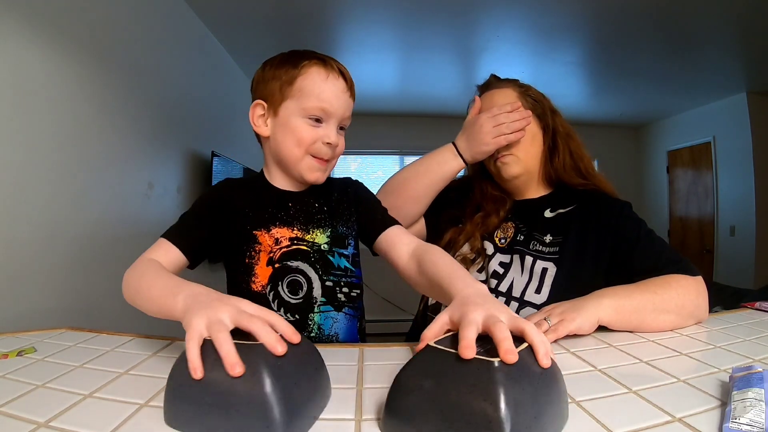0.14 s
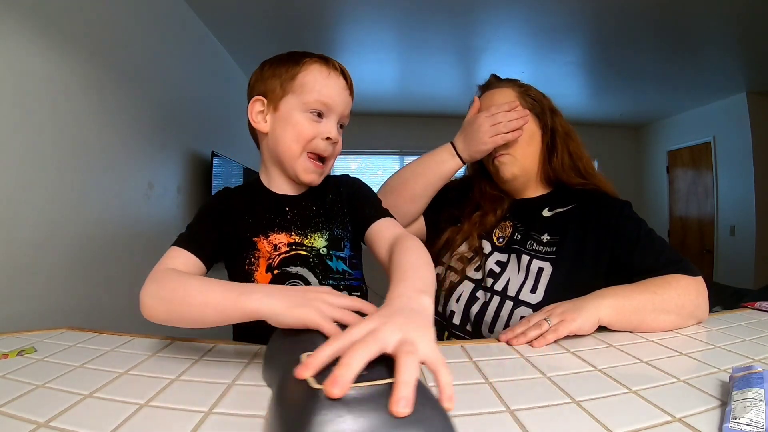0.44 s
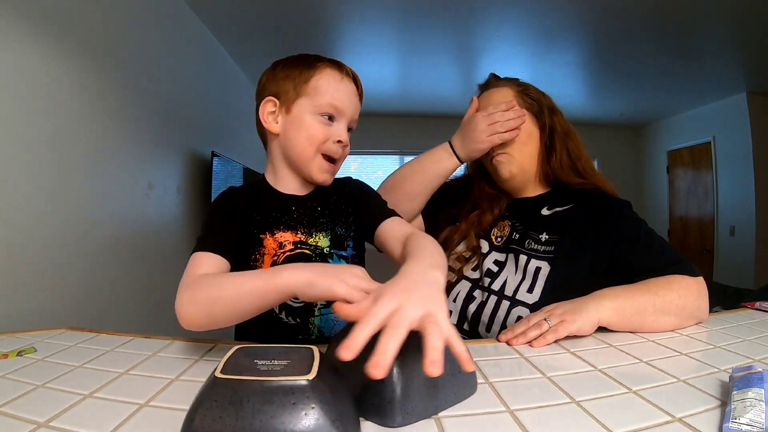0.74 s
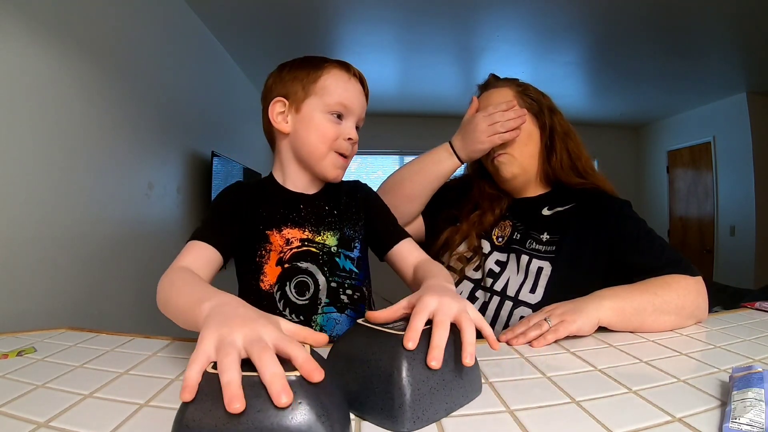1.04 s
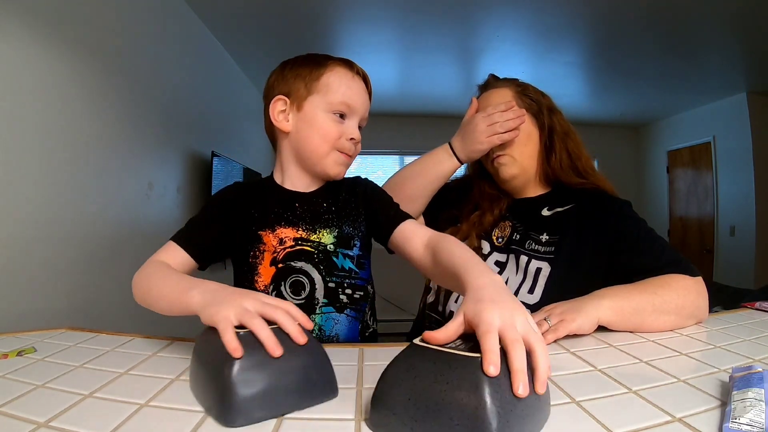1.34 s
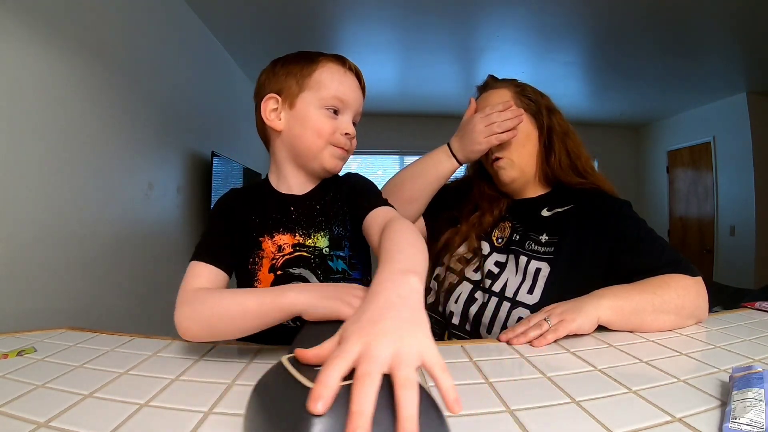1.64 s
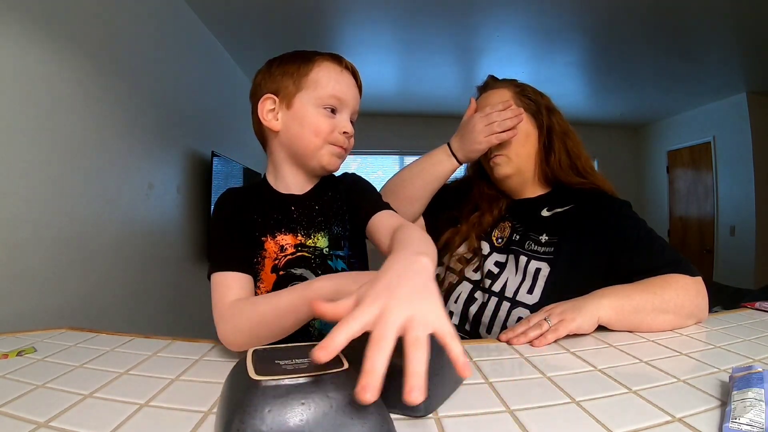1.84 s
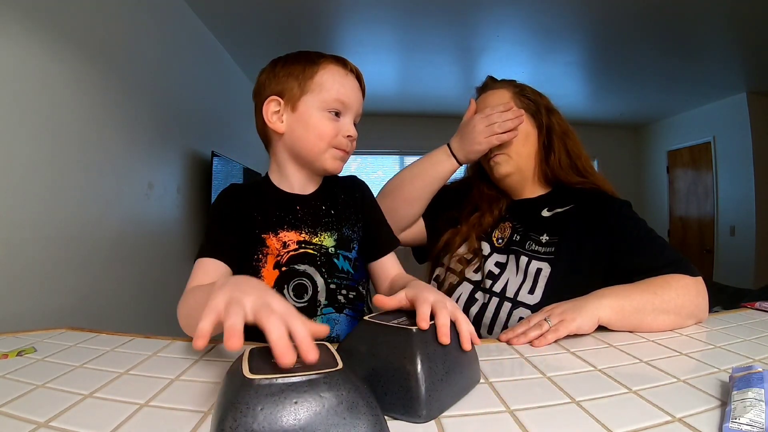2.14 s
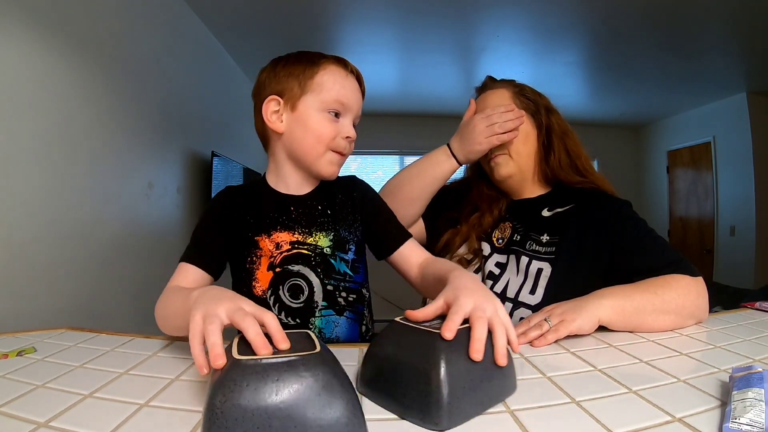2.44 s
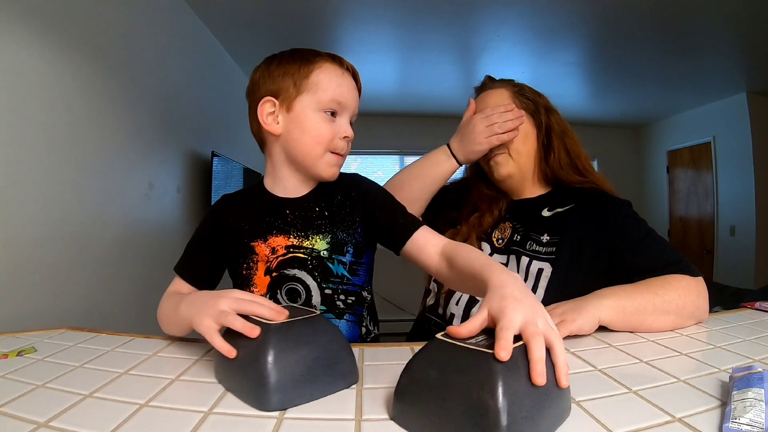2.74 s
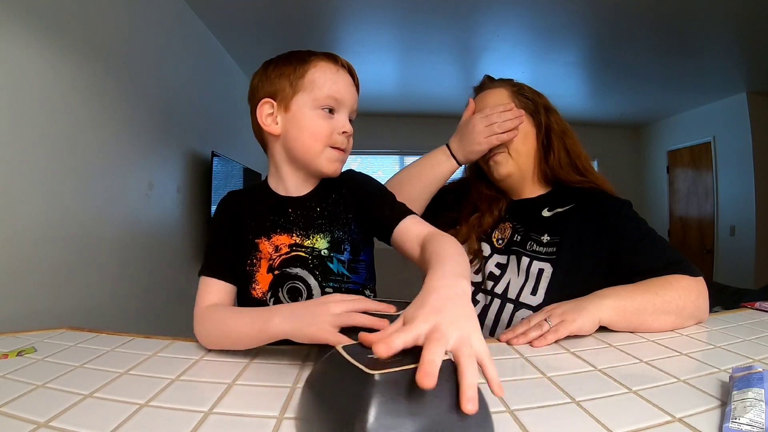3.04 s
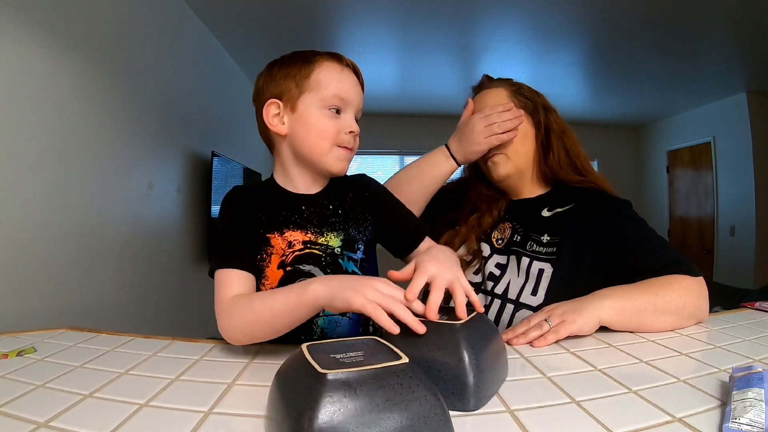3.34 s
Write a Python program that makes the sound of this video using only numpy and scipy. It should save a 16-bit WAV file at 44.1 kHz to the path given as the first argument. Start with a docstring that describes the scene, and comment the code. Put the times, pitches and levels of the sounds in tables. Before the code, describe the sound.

Two upturned ceramic bowls are shuffled over a tiled counter, close by, with rapid, uneven clacks and soft thumps. Hollow, gritty scraping comes at 0.3 to 0.7 seconds with light ringing clinks, and again from 1.1 to 2. After a brief lull, scraping and knocking resume from 2.4 to 3.4. Short hollow pops sound near 1.1, 1.7 and 3 seconds. The kitchen adds a short echo.

```python
"""Two bowls shuffled over a counter

Two upturned glazed ceramic bowls slide over kitchen tiles. Their rims grind, knock at the
grout lines and clink together. Each bowl rings with its own tones, the air under them
sounds hollow, the counter thumps and the kitchen echoes."""
import sys
import numpy as np
from scipy import signal
from scipy.fft import rfft, irfft
from scipy.io import wavfile

SR = 44100
rng = np.random.default_rng(int(sys.argv[2]) if len(sys.argv) > 2 else 0)


def unload_audio(sound):
    """Save the sound as a 16-bit wav file, at the path given as the first command line argument."""
    columns = np.transpose(np.atleast_2d(sound))
    # keep every value between -1 and 1, then stretch to whole-number steps
    steps = np.round(np.clip(columns, -1, 1) * 32767)
    wavfile.write(sys.argv[1], SR, steps.astype(np.int16))


N = 154350

# The tones (modes) that each bowl and the counter ring with.
# Each row: pitch in Hz, relative level in dB, seconds to fade by 60 dB.
FIRST_BOWL_MODES = [(1484,7,.17),(1513,3,.15),(2594,3,.2),(3321,0,.3),(4487,-5,.26),(5599,-8,.27),(6670,-19,.2),(7023,-22,.25)]
SECOND_BOWL_MODES = [(1572,7,.14),(1605,3,.14),(2735,3,.17),(3442,-4,.19),(4762,-8,.17),(5886,-15,.17),(7228,-17,.2)]
COUNTER_MODES = [(73.2,-7,0.55),(130.1,5,0.25),(163.4,4.5,0.18),(193.7,-8.5,0.94)]


def amp(db):
    """Turns decibels into a gain."""
    return 10 ** (np.asarray(db) / 20)


def evened(x):
    """Scales a signal to an average power of 1."""
    return x / np.sqrt(np.mean(x ** 2) + 1e-20)


def read(points, hz):
    """Reads between a curve's points on a log-frequency axis."""
    freqs, values = np.transpose(points)
    return np.interp(np.log(hz + 1), np.log(freqs + 1), values)


def add(mix, start_s, sound):
    """Mixes a sound in at its start time."""
    part = mix[..., max(round(start_s * SR), 0):][..., :sound.shape[-1]]
    part += sound[..., :part.shape[-1]]


def through(x, response):
    """Filters x, given the filter's response to one click."""
    return signal.fftconvolve(np.atleast_2d(x), np.atleast_2d(response), axes=1)[:, :N]


def colour(spectrum, size=4096):
    """The click response, with energy 1, of a filter shaped like this spectrum."""
    log_gain = np.log(amp(read(spectrum, abs(np.fft.fftfreq(size, 1 / SR)))))
    response = np.fft.ifft(np.exp(np.conj(signal.hilbert(log_gain)))).real[:size // 2]
    return response / np.linalg.norm(response)


def drift(seconds):
    """A smooth random wobble that changes over about this time."""
    window = signal.windows.hann(int(2 * seconds * SR) + 3)
    return np.clip(evened(signal.fftconvolve(rng.standard_normal(N), window, "same")), -2, 2)


def hush():
    """A faint, steady, low background noise."""
    # Each row: frequency in Hz, relative level in dB.
    spectrum = [(70,-10),(150,4.5),(2000,-12.5),(9000,-34.5)]
    return amp(-49.5) * through(rng.standard_normal((2, N)), colour(spectrum))


def rattles(times, levels_db, spectrum, fade_s, snap, rise_s=0.002):
    """Each contact is one snap, then a noisy burst that swells over a few milliseconds and dies."""
    out, t = np.zeros((2, N)), np.arange(SR // 8) / SR
    envelope = amp(-60 * t / fade_s) * (1 - np.exp(-t / rise_s))
    for start, db in zip(times, levels_db):
        burst = rng.standard_normal((2, len(t))) * envelope
        burst /= np.linalg.norm(burst[0])
        burst[0, 0] += snap
        add(out, start, amp(db) * burst)
    return through(out, colour(spectrum))


def struck(times, levels_db, modes, spots_db):
    """Each blow feeds a bowl's ringing in step; the spot that is hit favours some tones."""
    t, out = np.arange(SR // 2) / SR, np.zeros((2, N))
    waves = np.array([amp(db - 60 * t / fade) * np.exp(2j * np.pi * hz * t) for hz, db, fade in modes])
    mid_side = np.array([np.ones(len(modes)), rng.choice([-1, 1], len(modes))])
    for start, db, spot_db in zip(times, levels_db, spots_db):
        in_step = np.exp(2j * np.pi * np.transpose(modes)[0] * start)
        add(out, start, (amp(db + spot_db) * in_step * mid_side @ waves).real)
    return out


def knocks():
    """A rim hits a tile edge: a clack, a hollow note, a sharp tick and a little ringing."""
    # Each row: start in seconds, then relative levels in dB of clack, hollow note and tick.
    hits = [(0.001,-17.5,-21,-30),(0.124,-14.5,-20,-32.5),(0.142,-9.5,-21.5,-22),(0.284,-10.5,-21,-20.5),
            (0.311,-14.5,-20,-24),(0.373,-11.5,-17,-19.5),(0.388,-18.5,-16.5,-20),(0.422,-16,-13.5,-21),
            (0.507,-12,-18.5,-28.5),(0.545,-16.5,-19,-37.5),(0.572,-10,-13.5,-22),(0.605,-16.5,-32,-13),
            (0.713,-23.5,-20.5,-21),(0.865,-13.5,-20.5,-18.5),(0.907,-18.5,-27.5,-23.5),
            (1.094,-14.5,-21.5,-30.5),(1.164,-17,-31,-38.5),(1.277,-13,-16.5,-22),(1.355,-8.5,-23.5,-40),
            (1.396,-11,-21,-17.5),(1.506,-9,-17.5,-21),(1.547,-8.5,-16.5,-18.5),(1.622,-10.5,-14.5,-23),
            (1.682,-16.5,-24.5,-25.5),(1.726,-17,-20,-33.5),(1.757,-16,-17,-33),(1.786,-15.5,-16.5,-30),(1.909,-24,-29,-38),
            (1.945,-16,-26,-43),(1.993,-14.5,-19,-28.5),(2.002,-10.5,-30,-22.5),(2.223,-33.5,-31.5,-69),
            (2.301,-20,-26.5,-35.5),(2.366,-32.5,-47,-50.5),(2.416,-16.5,-25.5,-30.5),
            (2.506,-14.5,-19.5,-31),(2.551,-9,-16.5,-25),(2.585,-21,-24.5,-30.5),(2.628,-14.5,-30,-36),(2.643,-10.5,-17.5,-32),
            (2.685,-10.5,-35,-30.5),(2.787,-10.5,-14,-22),(2.915,-12.5,-17.5,-27),
            (3.015,-12,-18,-23.5),(3.047,-15,-23,-21),(3.175,-26,-12.5,-31),
            (3.306,-13,-15.5,-28),(3.367,-19,-19.5,-33.5)]
    # The tone of those three parts. Each row: frequency in Hz, relative level in dB.
    clack_spectrum = [(150,-44.5),(400,-2.5),(650,4),(1100,5.5),(2800,-5),(4000,-18.5),(9000,-74.5)]
    hollow_spectrum = [(40,-51),(230,-18.5),(310,-3.5),(390,-0.5),(700,-17.5),(1500,-55.5)]
    tick_spectrum = [(800,11),(3500,12),(5000,4),(7000,-4.5),(9000,-3)]
    times, clack_db, hollow_db, tick_db = np.transpose(hits)
    ringing = np.zeros((2, N))
    for ring_db, modes in ((-34.5, FIRST_BOWL_MODES), (-35, SECOND_BOWL_MODES)):
        spots_db = 7.5 * rng.uniform(-2.3, 1, (len(times), len(modes)))
        ringing += struck(times, clack_db + ring_db, modes, spots_db)
    clack = rattles(times, clack_db + 15, clack_spectrum, fade_s=0.049, snap=0.29)
    hollow = rattles(times, hollow_db + 21.5, hollow_spectrum, fade_s=0.044, snap=0.32)
    tick = rattles(times, tick_db + 17.5, tick_spectrum, fade_s=0.019, snap=0.23)
    return clack + hollow + tick + ringing


def kitchen_echo(x, build_s=0.0081):
    """Reflections blur into a short echo, each frequency dying at its own speed."""
    # Each row: frequency in Hz, seconds to fade by 60 dB.
    fade_times = [(200,0.54),(500,0.57),(1200,0.43),(3000,0.34)]
    hz, t, bands = signal.stft(rng.standard_normal((2, SR)), SR, nperseg=256)
    bands *= amp(-60 * t / read(fade_times, hz)[:, None])
    tail = signal.istft(bands, SR, nperseg=256)[1]
    tail *= np.minimum(np.arange(tail.shape[1]) / SR / build_s, 1) ** 2
    return through(x, tail / np.linalg.norm(tail[0]))


def ring(modes):
    """The fading tones after one tap, each placed left or right at random."""
    out, t = np.zeros((2, SR)), np.arange(SR) / SR
    for (hz, db, fade), lean in zip(modes, rng.choice([-1, 1], len(modes))):
        tone = amp(db - 60 * t / fade) * np.sin(2 * np.pi * hz * t)
        out += [tone, lean * tone]
    return out


def thumps(rise_s=0.012):
    """The counter booms as a bowl's weight drops onto it."""
    # Each row: start in seconds, relative level in dB.
    landings = [(0.138,-28),(0.394,-32),(0.593,-25.5),(0.868,-29.5),(1.384,-28),(1.551,-24),(1.995,-28.5),(2.792,-23.5),(3.049,-24)]
    force, t = np.zeros(N), np.arange(SR) / SR
    for start, db in landings:
        add(force, start, amp([db]))
    return through(force, ring(COUNTER_MODES) * (1 - np.exp(-t / rise_s)))


def slips(per_second=1400, spread_db=5.2):
    """Tiny slips of a rim make random clicks of uneven size."""
    size = amp(spread_db * np.minimum(rng.exponential(1, N), 4))
    slipping = rng.random(N) < per_second / SR
    return evened(size * slipping * rng.choice([-1, 1], (2, N)))


def hollow_air(x, centre_hz=355, width_hz=190, wander_octaves=0.22):
    """The air under a bowl resonates; its pitch wanders as the gap under the rim opens and shuts."""
    hz = centre_hz * 2 ** (wander_octaves * drift(seconds=0.05))
    turn = np.exp(2j * np.pi * np.cumsum(hz) / SR)
    r = np.exp(-np.pi * width_hz / SR)
    # Shift the pitch down to zero, keep only what is near it, then shift back.
    return (turn * signal.lfilter([(1 - r) ** 2], [1, -2 * r, r * r], x / turn)).real


def rubbed(force, modes, cutoff_hz=3020):
    """Friction keeps tones ringing and favours the low ones."""
    response = ring(modes)
    soft = signal.sosfilt(signal.butter(1, cutoff_hz, fs=SR, output="sos"), force[0])
    return through(soft, response / np.linalg.norm(response[0]))


def sliding(push_s=0.012, stop_s=0.07):
    """Juddering rims grind on the glaze and shake the bowls, the air under them and the counter."""
    # Each row: start and end in seconds, then relative levels in dB of grinding and rumble.
    strokes = [(0.31,0.704,-26,-27),(1.118,1.275,-39,-35.5),(1.22,1.674,-28.5,-29.5),(1.669,1.981,-30.5,-29.5),(2.433,2.53,-35,-31.5),(2.512,2.91,-26.5,-28.5),(2.91,3.158,-26.5,-27.5),(3.266,3.406,-35.5,-33.5)]
    t, grind, rumble = np.arange(N) / SR, np.zeros(N), np.zeros(N)
    judder = evened(amp(3.6 * drift(seconds=0.011)))
    swell = evened(amp(3 * drift(seconds=0.05)))
    for start, end, grind_db, rumble_db in strokes:
        speed = judder * np.clip(np.minimum((t - start) / push_s, 1 + (end - t) / stop_s), 0, 1)
        grind = np.maximum(grind, speed * amp(grind_db))
        rumble = np.maximum(rumble, speed * amp(rumble_db))
    # Each row: frequency in Hz, relative level in dB.
    grind_spectrum = [(150,-25),(400,3.5),(1300,4),(2000,-4.5),(4500,-20.5),(6500,-31),(9000,-25)]
    return (amp(-6.5) * through(grind * slips(), colour(grind_spectrum))
            + amp(20.5) * hollow_air(swell * rumble * slips())
            + amp(-16) * rubbed(grind * slips(), FIRST_BOWL_MODES)
            + amp(-9.5) * rubbed(grind * slips(), SECOND_BOWL_MODES)
            + amp(-12.5) * rubbed(rumble * slips(), COUNTER_MODES))


def clinks(boost_db=10.5, width_octaves=0.18):
    """The bowls bump and both ring; the spot that is hit boosts the tones near one pitch."""
    # Each row: start in seconds, relative dB of the first and second bowl, boosted pitch in Hz.
    bumps = [(.372,-42,-35,1590),(.422,-30.5,-40,5040),(.572,-41,-50,3321),(.604,-34,-42,6800),(.641,-32.5,-46,3090),(.865,-54,-41,2740),(1.277,-37,-48,2590),(1.355,-35,-46,2590),(2.79,-44,-38,1590),(3.048,-33,-48,2900)]
    times, first_db, second_db, boosted_hz = np.transpose(bumps)
    out = np.zeros((2, N))
    for db, modes in ((first_db, FIRST_BOWL_MODES), (second_db, SECOND_BOWL_MODES)):
        octaves_away = np.log2(np.transpose(modes)[0] / boosted_hz[:, None])
        out += struck(times, db, modes, boost_db * np.exp(-(octaves_away / width_octaves) ** 2))
    return out


def pops(rise_s=0.002, fade_s=0.062):
    """A rim claps down flat and the trapped air gives one short round note."""
    # Each row: start in seconds, level in dB, pitch in Hz.
    claps = [(1.094,-16.5,387),(1.672,-12,353),(2.965,-9.5,324.6),(3.016,-10,418)]
    mid, t = np.zeros(N), np.arange(SR // 2) / SR
    envelope = amp(-60 * t / fade_s) * (1 - np.exp(-t / rise_s))
    for start, db, hz in claps:
        add(mid, start, amp(db) * envelope * np.sin(2 * np.pi * hz * t))
    return np.array([mid, np.zeros(N)])


def scene(lean_right_db=0.8):
    """Mixes the sounds as mid (what both ears share) and side (how they differ), then left and right."""
    # Nearly mono bass, wide treble. Each row: frequency in Hz, gain of the side signal in dB.
    stereo_width = [(280,-25.5),(450,-16),(750,-4),(1400,-2),(2800,-8.5),(5500,-5.5),(9000,1.5)]
    bowls = knocks() + pops() + clinks() + sliding()
    mid, side = hush() + bowls + thumps() + amp(-1) * kitchen_echo(bowls[0])
    side_gain = amp(read(stereo_width, np.fft.rfftfreq(2 * N, 1 / SR)))
    side = irfft(rfft(side, 2 * N) * side_gain)[:N]
    return np.array([mid + side, mid - side]) * amp([[-lean_right_db], [lean_right_db]])


def record(dry, low_cut_hz=62, edge_hz=9030, top_hz=15500):
    """The deepest bass is cut away; the treble steps down at edge_hz and ends at top_hz."""
    dry = signal.sosfilt(signal.butter(2, low_cut_hz, "highpass", fs=SR, output="sos"), dry)
    edge, top = (signal.firwin(511, hz, window=("kaiser", 9), fs=SR) for hz in (edge_hz, top_hz))
    above_edge = amp(-28)
    treble_cut = (1 - above_edge) * edge + above_edge * top
    return signal.oaconvolve(dry, treble_cut[None], "same", axes=1)


dry = scene()
out = record(dry)
unload_audio(out)
```